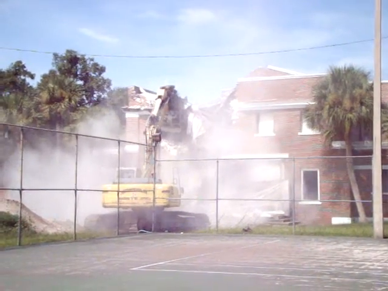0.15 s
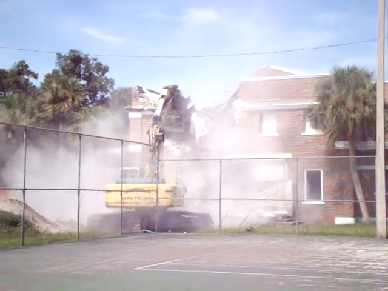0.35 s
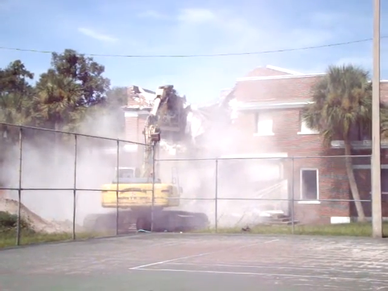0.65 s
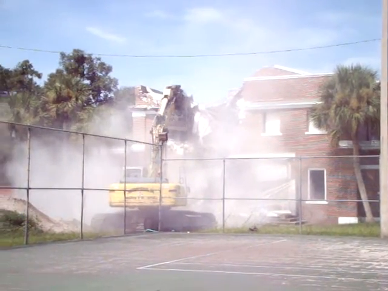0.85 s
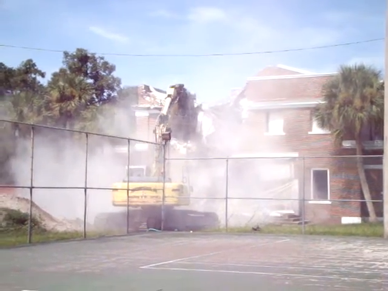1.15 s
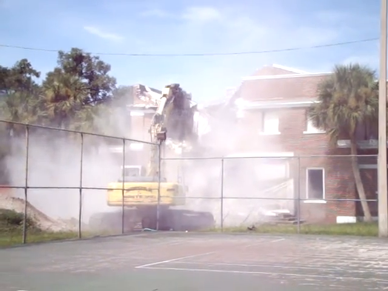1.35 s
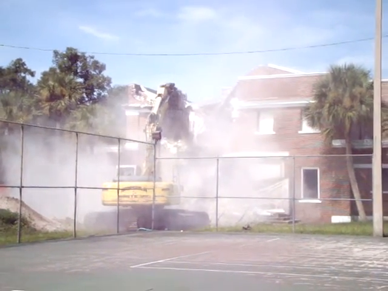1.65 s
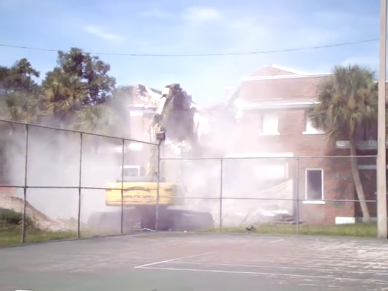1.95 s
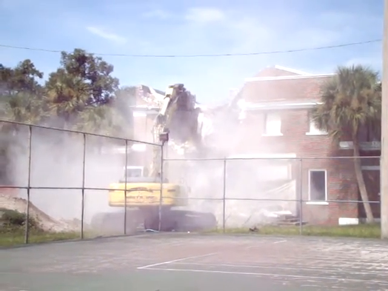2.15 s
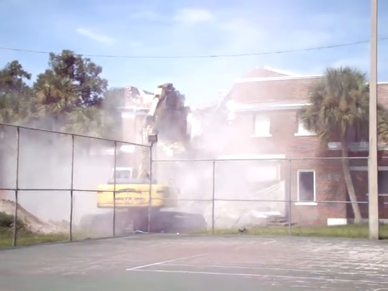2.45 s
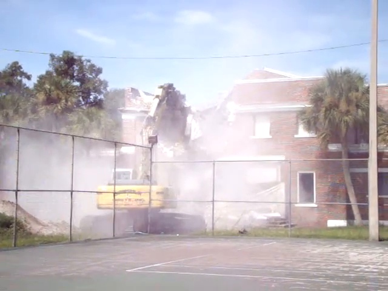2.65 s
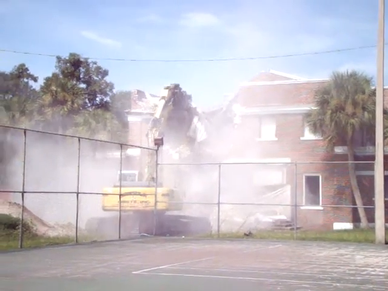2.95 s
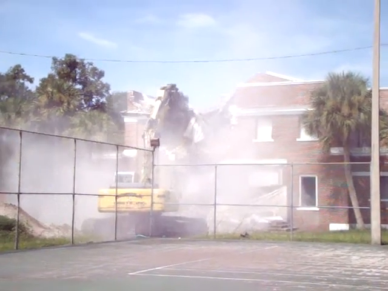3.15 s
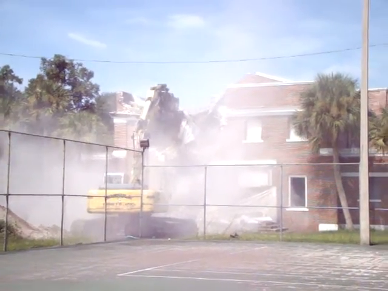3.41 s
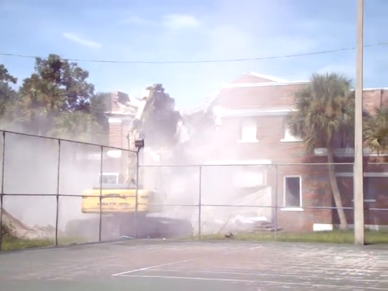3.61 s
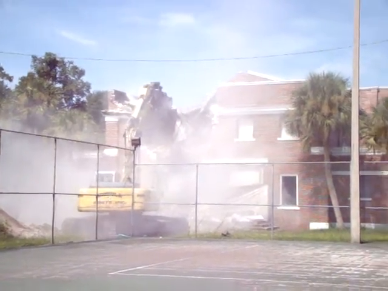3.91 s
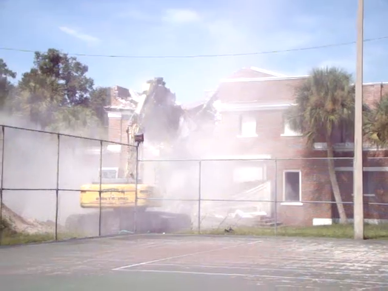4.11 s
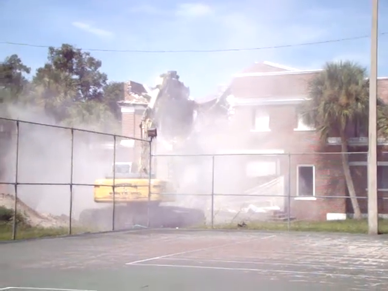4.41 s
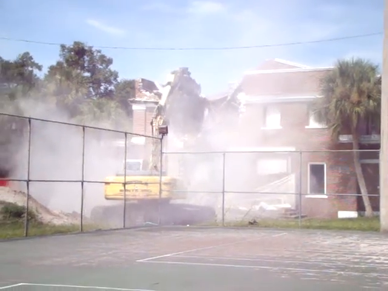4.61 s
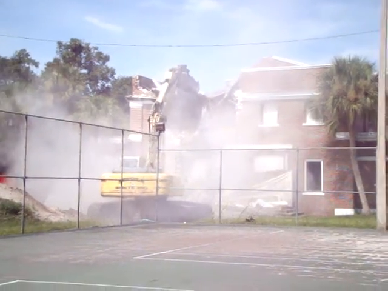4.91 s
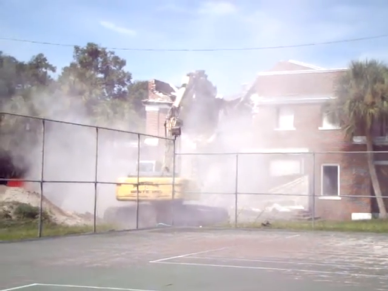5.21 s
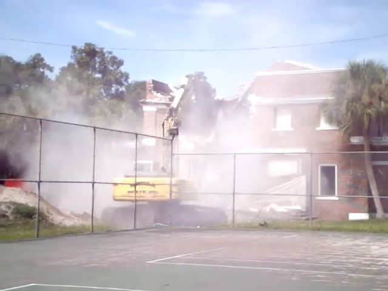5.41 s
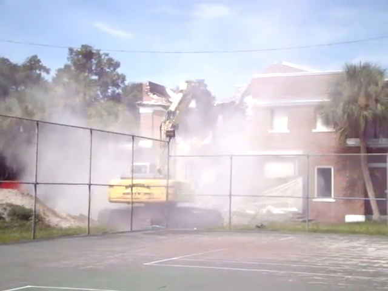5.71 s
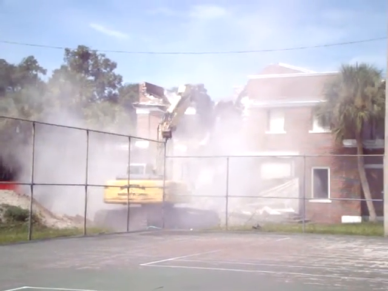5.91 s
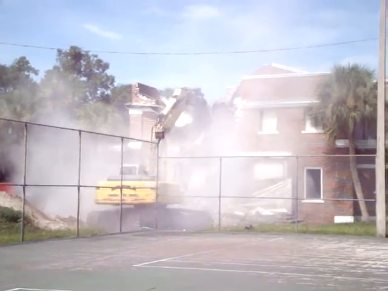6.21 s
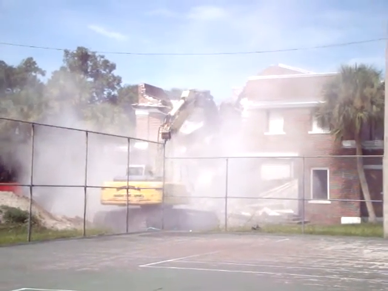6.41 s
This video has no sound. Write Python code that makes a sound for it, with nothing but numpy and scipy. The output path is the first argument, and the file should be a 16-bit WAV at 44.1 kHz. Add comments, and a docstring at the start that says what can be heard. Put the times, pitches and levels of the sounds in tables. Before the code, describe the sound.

Across an open paved court, an excavator's diesel drones with fan hum and hydraulic whine. Bricks thud and shatter, timber cracks and creaks twice early on, then a dense fall pours grit and rubble. Scattered knocks and snaps follow, and a section of roof clatters down near the end. The microphone stands at a moderate distance, with a short, faint echo.

```python
"""Bricks, boards and a piece of roof crash down as an excavator demolishes a building across a paved court.
Falls are showers of random contacts ringing resonances; timber tears twice in stick-slip creaks;
rubble and grit slide as streams of contacts. Behind them the diesel drones in coloured noise and
lines locked to its firing, under a fan tone and a hydraulic whine."""
import sys
import numpy as np
from scipy import signal
from scipy.fft import rfft, irfft
from scipy.io import wavfile

SR = 44100
rng = np.random.default_rng(int(sys.argv[2]) if len(sys.argv) > 2 else 0)


def digitize_waveform(pressure):
    """Quantize a signal to 16-bit integers and store it at the path in sys.argv[1].

    Rows of a 2-D input are taken as channels; values are limited to [-1, 1].
    """
    field = np.atleast_2d(pressure).T
    bounded = np.clip(field, -1, 1)
    quanta = np.round(bounded * 32767).astype(np.int16)
    wavfile.write(sys.argv[1], SR, quanta)


N = 289296
TIME = np.arange(N) / SR  # s

# Colour of landing and breaking masonry. Each row: frequency in Hz, density in dB per Hz (relative).
BRICK_COLOUR = [(100, -39), (520, -19), (720, 4.5), (1000, 4), (1600, 1.5), (2400, 1), (4400, -2),
                (5200, -6.5), (7000, -4), (10000, -10.5), (12000, -78.5)]


def from_db(db):
    """Decibels to gain."""
    return 10 ** (np.asarray(db) / 20)


def rms_one(x):
    """Scale to rms 1."""
    return x / np.sqrt(np.mean(x ** 2) + 1e-20)


def in_time(rows):
    """Interpolate a curve of (seconds, value) at every sample."""
    s, value = np.transpose(rows)
    return np.interp(TIME, s, value)


def place(out, start_s, sound):
    """Add a sound at its start, cut at the end of the scene."""
    at = int(start_s * SR)
    out[at:at + len(sound)] += sound[:N - at]


def drift(rate_hz):
    """Slow random wander of spread 1: two-pole smoothed noise at 1/40 of the sample rate."""
    step, settle = 40, 2000
    r = np.exp(-2 * np.pi * rate_hz * step / SR)
    noise = rng.standard_normal(N // step + settle + 2)
    slow = signal.lfilter([1], [1, -2 * r, r * r], noise)[settle:]
    return np.interp(np.arange(N) / step, np.arange(len(slow)), rms_one(slow))


def colour(x, spectrum, tilt_db=0):
    """Minimum-phase filter of a given spectrum, tilted per octave above 600 Hz; white input keeps its power."""
    size = 2 ** int(np.ceil(np.log2(len(x))))
    octave = np.log2(np.maximum(np.fft.rfftfreq(size, 1 / SR), 1))
    hz, db = np.transpose(spectrum)
    tilt = tilt_db * np.maximum(octave - np.log2(600), 0)
    gain = rms_one(from_db(np.interp(octave, np.log2(hz), db) + tilt))
    # fold the cepstrum: minimum phase
    cepstrum = irfft(np.log(gain + 1e-12))
    cepstrum[1:size // 2] *= 2
    cepstrum[size // 2 + 1:] = 0
    return irfft(rfft(x, size) * np.exp(rfft(cepstrum)))[:len(x)]


def resonate(x, hz, width_hz):
    """Two-pole resonance with gain 1 on top."""
    r = np.exp(-np.pi * width_hz / SR)
    zeros = np.array([1, 0, -1]) * (1 - r * r) / 2
    poles = [1, -2 * r * np.cos(2 * np.pi * hz / SR), r * r]
    return signal.lfilter(zeros, poles, x + 1e-18)


def contacts(per_s, spread_db, size):
    """Random clicks of either sign with exponentially spread levels in dB; rms 1."""
    strength = from_db(spread_db * np.minimum(rng.exponential(1, size), 4))
    sign = rng.choice([-1, 1], size)
    return rms_one(strength * sign * (rng.random(size) < per_s / SR))


def shatter(t60_s, ring_db=3, q=9, count=5):
    """One landing: the first contact snaps and rings the piece, then a shower of splinters dies away."""
    age = TIME[:2 ** 15]
    snap_db, snap_s = -3, 0.006
    # every piece has modes of its own, spread from 1000 to 5060 Hz
    pitches_hz = 1000 * 5.06 ** ((np.arange(count) + rng.random(count)) / count)
    blow = rng.standard_normal(len(age)) * np.exp(-2 * age / snap_s)
    snap = 1.5 * blow + sum(resonate(blow, hz, hz / q) for hz in pitches_hz)
    snap *= np.sqrt(snap_s * SR) / np.linalg.norm(snap)
    brittle = min(1, 0.048 / t60_s)  # big masses crumble rather than snap
    swell = 1 - np.exp(-age / (0.008 * t60_s))
    shower = contacts(per_s=9000, spread_db=2.0, size=len(age)) * swell * from_db(-60 * age / t60_s)
    ringing = sum(resonate(shower, hz, hz / q) for hz in pitches_hz)
    splinters = shower + from_db(ring_db) * ringing
    return brittle * from_db(snap_db) * snap + 0.82 * splinters * np.std(shower) / np.std(splinters)


def crashes():
    """Heavy masonry lands dull, boards and tiles crack bright."""
    # The loudest falls of bricks and boards.
    # Each row: start in seconds, level in dB, t60 in seconds, brightness in dB per octave.
    falls = [(0.261, -17, 0.19, 0), (0.893, -23.5, 0.13, 5), (1.080, -17.5, 0.2, -0.5),
             (1.62, -19.5, 0.1, 4.5), (1.695, -20, 0.13, -1.5), (1.768, -18, 0.34, 0.5),
             (1.819, -18, 0.36, 0), (1.919, -18.5, 0.32, 1), (1.952, -17, 0.25, 0), (2.098, -25, 0.37, 1),
             (2.237, -22.5, 0.28, 1), (2.98, -25, 0.59, 0.5), (3.405, -21.5, 0.18, 1),
             (3.434, -16.5, 0.12, 0.5), (3.546, -17.8, 0.1, 1), (3.583, -19.5, .08, -1.5),
             (3.882, -17.5, 0.11, 3), (4.374, -16, 0.26, 0.5), (4.404, -18.5, 0.17, -2.5),
             (5.743, -20, 0.093, -1.5), (6.021, -17, 0.25, -3), (6.44, -20.5, 0.28, 1)]
    out = np.zeros(N)
    for start_s, level_db, t60_s, tilt_db in falls:
        hit = colour(shatter(max(t60_s, 0.02)), BRICK_COLOUR, tilt_db)
        place(out, start_s, from_db(level_db) * hit)
    return out


def landing(age, rise_s, hold_s, t60_s):
    """Envelope of a mass coming to rest: it rises, holds and dies away."""
    return (1 - np.exp(-age / rise_s)) * from_db(-60 * np.maximum(age - hold_s, 0) / t60_s)


def thuds(width_hz=380, crumbs_db=-9, rise_s=0.004, longest_hold_s=0.029):
    """A lump lands and crumbles: a run of contacts rings its own low note and the heap beneath."""
    # Heavy lumps with a hollow knock. Each row: start in seconds, level in dB, pitch in Hz, t60 in seconds.
    lumps = [(0.037, -20.5, 760, 0.087), (1.431, -17, 860, 0.16), (1.77, -20, 1050, .27),
             (2.585, -26, 850, 0.2), (3.272, -22.5, 1000, .2), (3.472, -19.5, 980, 0.073),
             (3.664, -18.5, 940, 0.18), (5.156, -25, 1100, .1), (5.372, -15, 970, .12),
             (5.478, -20.5, 820, 0.33)]
    # Upper resonances of the heap they strike. Each row: frequency in Hz, width in Hz, level in dB.
    heap_modes = [(1920, 170, -6.5), (2580, 360, -8.5)]
    out, age = np.zeros(N), TIME[:SR // 2]
    for start_s, level_db, pitch_hz, t60_s in lumps:
        masonry = rms_one(colour(contacts(per_s=2500, spread_db=0, size=len(age)), BRICK_COLOUR))
        body = rms_one(resonate(masonry, pitch_hz, width_hz))
        heap = sum(from_db(db) * rms_one(resonate(masonry, hz, width)) for hz, width, db in heap_modes)
        knock = rms_one(body + heap + from_db(crumbs_db) * masonry)
        envelope = landing(age, rise_s, min(longest_hold_s, t60_s / 10), t60_s)
        place(out, start_s, from_db(level_db) * envelope * knock)
    return out


def falling_roof(splinters_db=-5, rise_s=0.003, hold_s=0.012):
    """Each landing sends a shower of contacts through the same hollow boards, with splinters over it."""
    # Landings of one section of roof. Each row: start in seconds, level in dB, t60 in seconds.
    landings = [(5.319, -18.5, 0.35), (5.369, -20, 0.12), (5.474, -19, 0.26), (5.515, -20.5, 0.33),
                (5.603, -19.5, 0.98), (5.867, -21, 0.32)]
    # Resonances of its boards. Each row: frequency in Hz, width in Hz, level in dB.
    board_modes = [(840, 120, -2), (1430, 260, 1), (2290, 220, 0.5), (3170, 300, -1), (4100, 180, -5)]
    out, age = np.zeros(N), TIME[:SR // 2]
    for start_s, level_db, t60_s in landings:
        envelope = landing(age, rise_s, hold_s, t60_s)
        shower = contacts(per_s=2600, spread_db=2.5, size=len(age)) * envelope
        boards = sum(from_db(db) * resonate(shower, hz, width) for hz, width, db in board_modes)
        splinters = rms_one(colour(shower, BRICK_COLOUR))
        sound = rms_one(rms_one(boards) + from_db(splinters_db) * splinters)
        place(out, start_s, from_db(level_db) * np.std(shower) * sound)
    return out


def cracks(snap_db=0.0, q=6.7, splinters_db=-13, splinters_t60_s=0.19):
    """A piece breaks at once: a bright snap, a brief ring at its own pitch and a faint trail of splinters."""
    # Single boards and tiles snap. Each row: start in seconds, level in dB, pitch in Hz, t60 in seconds.
    breaks = [(.710, -15.5, 4600, 0.012), (0.7145, -14, 2400, 0.013), (2.4653, -16.5, 2280, 0.025),
              (2.5187, -21, 2730, 0.049), (3.0003, -20.5, 2500, 0.022), (3.0584, -21, 2500, 0.05),
              (3.4057, -16.5, 2750, 0.036), (4.182, -20, 2400, .012), (4.6805, -20.5, 3400, 0.033),
              (4.784, -17.5, 2000, 0.028), (5.1556, -17.5, 2630, 0.026), (5.3213, -21, 3340, .04),
              (5.3477, -16, 3500, 0.043), (5.369, -13.5, 2330, 0.034), (5.4655, -24, 4000, 0.023),
              (5.473, -13, 3200, 0.03), (5.4929, -18, 3570, 0.029), (5.5902, -17, 2290, 0.022),
              (5.6373, -15, 3680, 0.026), (5.7453, -18, 2520, 0.023), (5.9150, -16.5, 2280, 0.04),
              (6.0604, -17.5, 1520, .03), (6.4408, -17.5, 1580, 0.027)]
    out, age = np.zeros(N), TIME[:2 ** 13]
    for start_s, level_db, hz, t60_s in breaks:
        trail = from_db(splinters_db - 60 * age / splinters_t60_s)
        envelope = from_db(-60 * age / max(t60_s, 0.008)) + trail
        blow = rng.standard_normal(len(age)) * envelope
        ring = rms_one(resonate(blow, hz, hz / q))
        snap = rms_one(colour(blow, BRICK_COLOUR))
        sound = rms_one(ring + from_db(snap_db) * snap)
        place(out, start_s, from_db(level_db) * np.sqrt(np.mean(envelope ** 2)) * sound)
    return out


def tearing_timber(start_db=-8, t60_s=0.28, sag=0.07, sag_s=0.077, slips_per_s=230, uneven=0.32,
                   fibres_db=-5, ring_db=-6):
    """The beam sticks and slips, swelling until it lets go; its pitch sags as it splits, and it rings on."""
    # Tears. Each row: start in seconds, peak in seconds, let-go in seconds, level in dB, pitch factor,
    # offset of the upper resonances, above 3000 Hz, in dB.
    tears = [(0.728, 0.75, 0.769, -17, 1, -4), (1.085, 1.115, 1.122, -16, 1, -3)]
    # Resonances of the timber, before pitch factor and sag. Each row: frequency in Hz, width in Hz, level in dB.
    timber_modes = [(1000, 210, -14), (1830, 220, -7.5), (2120, 160, -5.5), (2330, 140, -8),
                    (2570, 150, -7), (3200, 1500, -15), (4000, 240, -4.5), (4360, 330, -10),
                    (6440, 820, -16.5)]
    # Notes the beam rings on with. Each row: frequency in Hz, width in Hz, level in dB.
    beam_notes = [(2076, 14, 3), (2230, 22, -8), (2380, 16, -4), (2500, 18, 1)]
    out, age = np.zeros(N), TIME[:SR // 2]
    for start, peak, let_go, level_db, factor, upper_db in tears:
        gaps, sizes = rng.standard_normal((2, 200))
        gaps_s = np.exp(uneven * gaps) / slips_per_s  # slips_per_s sets the median gap
        slip_at = (np.cumsum(gaps_s) * SR).astype(int)
        slips = np.bincount(slip_at, from_db(2 * sizes), SR)[:SR]
        fibres = contacts(per_s=2800, spread_db=-10.0, size=SR)
        drive = rms_one(slips) + from_db(fibres_db) * fibres
        wood = 0
        for k, (hz, width, db) in enumerate(timber_modes):
            gain = from_db(db + upper_db * (hz > 3000)) * (-1) ** k
            wood = wood + gain * resonate(drive, factor * hz, width)
        pitch = 1 + sag * np.interp(age, [0, 2 * sag_s], [1, -1])
        rise_db = np.interp(age, [0, peak - start], [start_db, 0])
        swell = from_db(rise_db - 60 * np.maximum(age + start - let_go, 0) / t60_s)
        creak = swell * np.interp(np.cumsum(pitch), np.arange(SR), rms_one(wood))
        ring = sum(from_db(db) * rms_one(resonate(creak, hz, width)) for hz, width, db in beam_notes)
        sound = creak + from_db(ring_db) * np.std(creak) * rms_one(ring)
        place(out, start, from_db(level_db) * sound / (1 + from_db(ring_db) / 2))
    return out


def fragments(per_s, spread_db, q, count=20):
    """Each contact rings a fragment of one of many sizes, longer for higher q; rms 1."""
    clicks, dealt = contacts(per_s, spread_db, N), rng.integers(0, count, N)
    pitches_hz = np.geomspace(450, 10000, count)
    return rms_one(sum(resonate(clicks * (dealt == k), hz, hz / q) for k, hz in enumerate(pitches_hz)))


def sliding_debris():
    """Brick lumps tumble in clumps, single ones clack among them, and mortar grit streams over them."""
    # Flow of coarse rubble down the heap. Each row: time in seconds, level in dB.
    rubble_flow = [(0, -31), (.14, -26), (.42, -35.5), (.88, -33), (1.22, -34), (1.42, -26), (1.95, -31),
                   (2.04, -34), (2.23, -28.5), (2.4, -35.5), (3.15, -34), (3.3, -28), (4.4, -28),
                   (4.85, -29), (5.42, -33.5), (5.52, -26.5), (6.56, -28.5)]
    # Flow of fine grit, which pours once the wall gives way. Each row: time in seconds, mean level in dB.
    grit_flow = [(0, -36), (.27, -28), (.43, -36.5), (.7, -38), (1.25, -44), (1.3, -24.5), (1.92, -25.5),
                 (2.04, -35.5), (2.26, -29), (2.38, -33.5), (3.15, -34), (3.4, -30.5), (3.88, -30),
                 (4.55, -30), (5.15, -34), (5.68, -26), (6.56, -30.5)]
    # Colours of rubble and of grit. Each row: frequency in Hz, density in dB per Hz (relative).
    rubble_colour = [(60, -49), (300, -6), (520, -18), (720, 6), (950, 4.5), (1500, 1), (2500, -1.5),
                     (4200, -11.5), (6000, -5), (10000, -9), (12000, -83)]
    grit_colour = [(60, -50.5), (800, -6), (2000, -1), (3850, 1), (5200, -3.5), (7000, -7.5), (10000, -13),
                   (12000, -72)]
    lumps = from_db(2.7 * drift(23)) * fragments(per_s=3200, spread_db=1.0, q=4.4, count=28)
    clacks = from_db(-11.5) * fragments(per_s=120, spread_db=0.5, q=54, count=17)
    rubble = rms_one(colour(lumps + clacks, rubble_colour))
    grit = rms_one(colour(contacts(per_s=6000, spread_db=1.0, size=N), grit_colour))
    grit_db = in_time(grit_flow) + 3.04 * drift(62)
    return from_db(in_time(rubble_flow)) * rubble + from_db(grit_db) * grit


def court(x, t60_s, wet_db):
    """Walls and heap scatter a dull, sparse trail of echoes."""
    age = TIME[:SR // 2]
    echoes = contacts(900, 3.1, len(age)) * from_db(-60 * age / t60_s) * (age > 0.004)
    echoes = signal.sosfilt(signal.butter(1, 5000, fs=SR, output="sos"), echoes)
    trail = signal.fftconvolve(x, echoes / np.linalg.norm(echoes))[:N]
    wet = from_db(wet_db)
    return (x + wet * trail) / np.hypot(1, wet)


def tones(turns, lines, waver_db, waver_hz):
    """Lines locked to a rotation; on the way through the air the higher ones fade in and out more."""
    out = 0
    for k, db in lines:
        gain = from_db(db + waver_db * np.sqrt(k) * drift(waver_hz))
        out = out + gain * np.sin(2 * np.pi * (k * turns + rng.random()))
    return np.sqrt(2) * out


def machine_levels():
    """Levels in dB of the diesel and of the fan tone, which swings wider and now and then fades."""
    # Level of diesel and pump, with two deep dips. Each row: time in seconds, level in dB.
    machine = [(0, -32), (1.3, -32.5), (1.45, -36.5), (2.0, -37.5), (2.45, -35), (2.85, -35), (3.3, -33),
               (4.3, -31.5), (4.5, -32.5), (5.32, -34.5), (5.5, -38.5), (5.8, -39.5), (6.56, -34.5)]
    # Brief fades of the fan tone. Each row: centre in seconds, depth in dB.
    fan_fades = [(.19, 7), (.8, 14), (1.0, 14), (1.7, 30), (4.93, 18)]
    fan_mean_db, fan_db_per_db, fade_s = -37.5, 1.74, 0.036
    diesel_db = in_time(machine)
    fades_db = sum(depth_db * np.exp(-((TIME - s) / fade_s) ** 2) for s, depth_db in fan_fades)
    return diesel_db, fan_mean_db + fan_db_per_db * (diesel_db - diesel_db.mean()) - fades_db


def excavator():
    """Exhaust, cooling fan and piston pump all turn with the crankshaft; the roar pulses with each firing."""
    # Diesel speed, hunting as the load comes and goes. Each row: time in seconds, mean firings per second.
    speed = [(0, 101.5), (.16, 103), (.4, 101.2), (.55, 101.9), (.7, 100.5), (.9, 105), (1.1, 101.5),
             (3.0, 100), (3.13, 102.3), (3.6, 100), (3.8, 101.7), (3.95, 99.6), (4.37, 101.3), (4.7, 99),
             (4.9, 104), (5.03, 101), (5.17, 102.5), (6.15, 100.2), (6.56, 102.3)]
    # Exhaust lines. Each row: multiple of the firing rate, level in dB.
    exhaust_lines = [(1, 0), (2.5, -5), (3, 4.5), (3.5, -3.5)]
    # Level of the exhaust note, with two deep dips. Each row: time in seconds, level in dB.
    exhaust_level = [(0, -44), (1.3, -47), (1.4, -54.5), (2.7, -52), (3.05, -46), (4.3, -46.5),
                     (5.3, -48.5), (5.65, -58.5), (6.56, -53.5)]
    # A drone at six times the firing rate comes and goes. Each row: time in seconds, dB relative to the diesel.
    drone_level = [(0, -22), (.16, 0), (.34, -23), (.44, -6), (.6, -6), (.75, -17.5), (1.9, -19),
                   (2.15, -8.5), (2.96, -11), (3.12, -4.5), (3.92, -9), (4.36, -5), (4.44, -5.5),
                   (4.78, -14), (4.86, -5.5), (5.02, -13), (5.13, -3.5), (5.6, -11.5), (6.45, -9)]
    # Hydraulic whine. Each row: multiple of the piston rate, level in dB.
    pump_lines = [(3, -7), (8, -7.5), (9, -9), (10, -16), (11, -11.5)]
    # The pump labours as the arm strains against the timber. Each row: time in seconds, load in dB.
    pump_load = [(0, -22), (.4, -2), (.64, -4), (.78, -8), (3.3, -3.5)]
    # Colour of the roar. Each row: frequency in Hz, density in dB per Hz (relative).
    roar_colour = [(30, -35), (70, -20.5), (130, -8.5), (190, 0.5), (260, 3), (350, 5), (480, -5.5),
                   (850, -1), (1600, -3.5), (2300, -8.5), (4500, -11), (10000, -54.5)]

    diesel_db, fan_db = machine_levels()
    firing_hz = in_time(speed) * (1 + 0.0015 * drift(9))
    firings = np.cumsum(firing_hz) / SR
    exhaust = tones(firings + 0.029 * drift(6.8), exhaust_lines, waver_db=2.0, waver_hz=4.4)
    exhaust = from_db(in_time(exhaust_level)) * exhaust
    drone = tones(firings + 0.021 * drift(13.4), [(6, 0.012)], waver_db=1.13, waver_hz=8.4)
    drone = from_db(in_time(drone_level)) * drone
    blades = 2.045 * firings  # belt-driven, just above twice the firing rate
    fan = tones(blades + 0.042 * drift(15.0), [(1, -0.41)], waver_db=2.0, waver_hz=8)
    pistons = 3 * firings
    pump = from_db(in_time(pump_load)) * tones(pistons, pump_lines, waver_db=0.6, waver_hz=4)
    pulsing = 1 + 0.12 * np.cos(2 * np.pi * firings)
    roar = from_db(3.0) * rms_one(colour(rng.standard_normal(N) * pulsing, roar_colour))
    return exhaust + from_db(diesel_db) * (drone + pump + roar) + from_db(fan_db) * fan


def scene():
    """Debris with the court's echoes over the dry machine, the same in both channels."""
    debris = crashes() + thuds() + falling_roof() + cracks() + sliding_debris() + tearing_timber()
    mono = excavator() + court(debris, t60_s=0.16, wet_db=-20.5)
    return np.array([mono, mono])


def record(dry):
    """The highest peaks are slightly rounded and the top is cut steeply."""
    cutoff_hz, ripple_db, stop_db = 10150, 0.1, 80
    steep_cut = signal.ellip(12, ripple_db, stop_db, cutoff_hz, fs=SR, output="sos")
    return signal.sosfilt(steep_cut, np.tanh(dry))


dry = scene()
out = record(dry)
digitize_waveform(out)
```